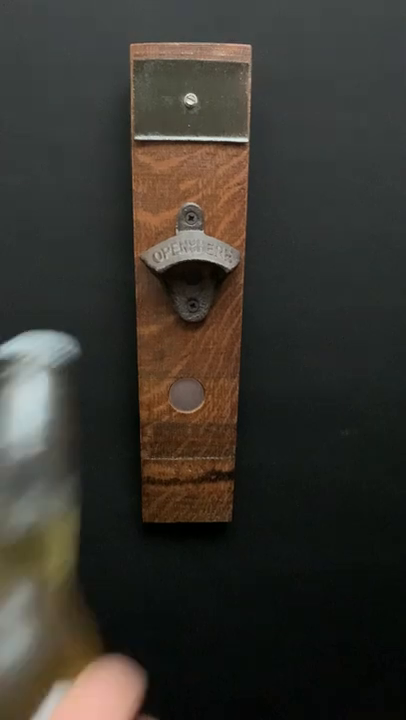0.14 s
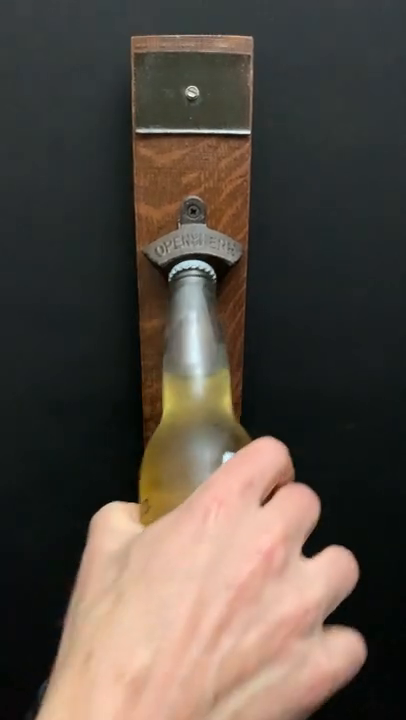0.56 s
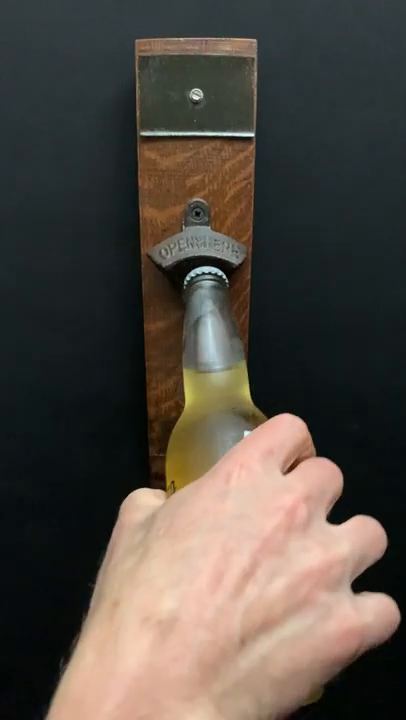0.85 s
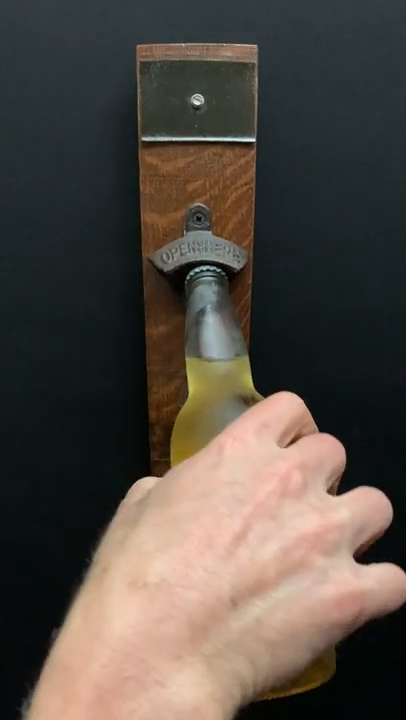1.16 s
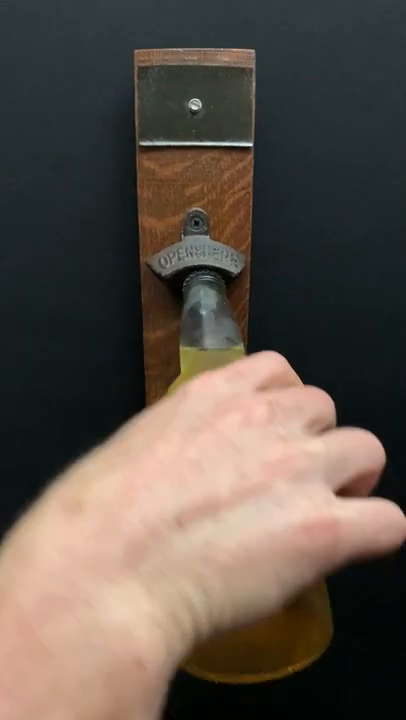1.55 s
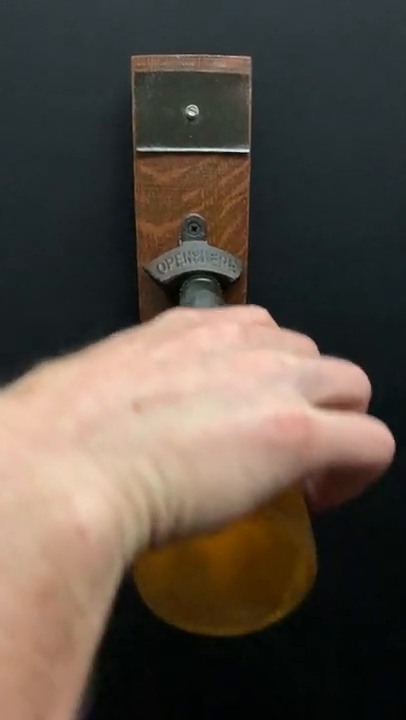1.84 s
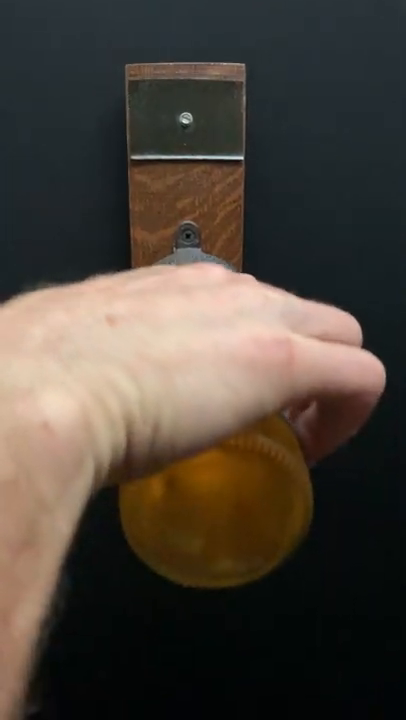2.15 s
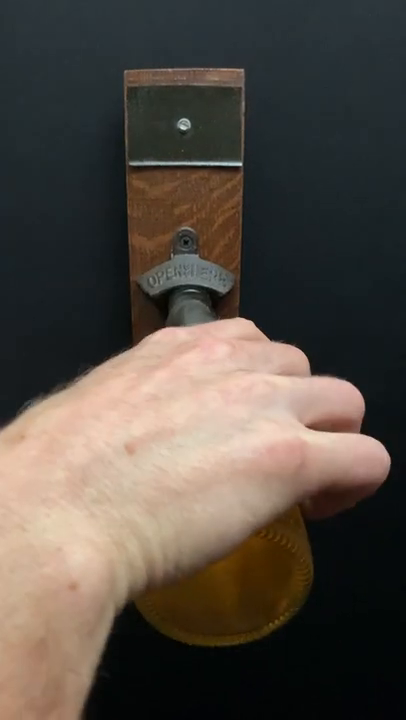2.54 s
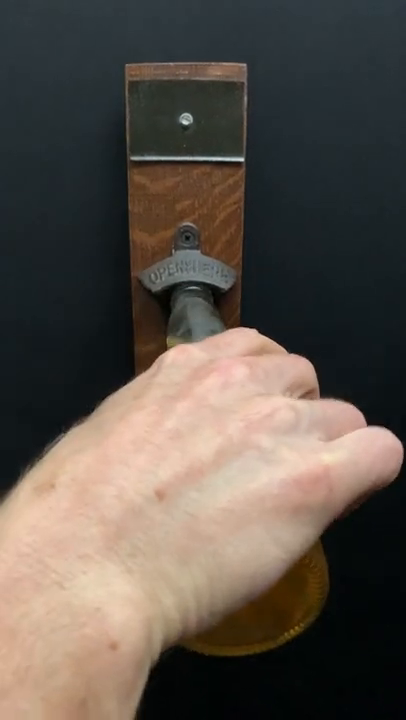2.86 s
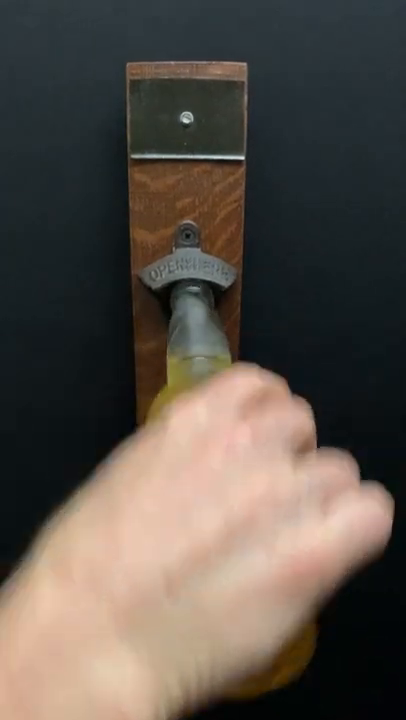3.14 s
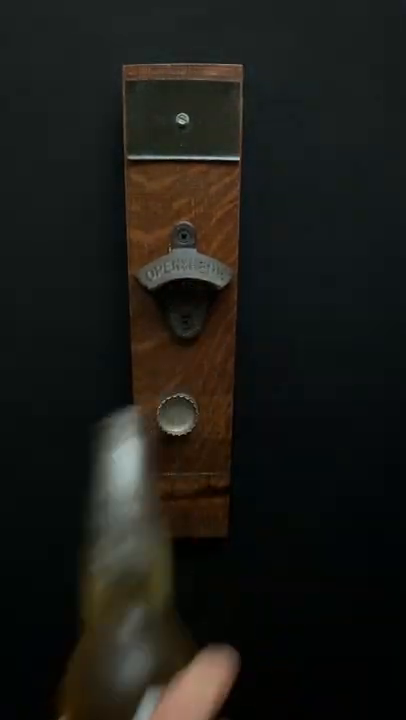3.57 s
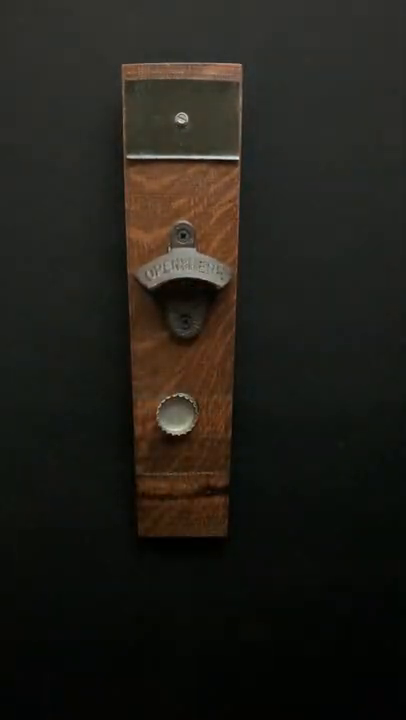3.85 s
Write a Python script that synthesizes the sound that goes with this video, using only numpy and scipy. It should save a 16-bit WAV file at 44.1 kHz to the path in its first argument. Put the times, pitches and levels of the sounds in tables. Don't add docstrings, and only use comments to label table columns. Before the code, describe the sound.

A bottle is opened on a wall opener, close, in a small room with low fridge hum. Glass taps iron and wood around 1.0 s, again at 1.5 and 2.0, with a firmer knock at 2.4. Gas spits for a tenth of a second at 2.85. At 3.2 the neck thumps free; at 3.36 the steel cap chatters loudly onto a magnet. The hum ducks, returning by 3.6.

```python
import sys
import numpy as np
from scipy import signal
from scipy.fft import rfft, irfft, next_fast_len
from scipy.io import wavfile
from scipy.ndimage import map_coordinates

SR = 44100
rng = np.random.default_rng(int(sys.argv[2]) if len(sys.argv) > 2 else 0)


def ratio(d):
    e = np.asarray(d, float) / 20
    return 10 ** e


def pcm_store(signal):
    levels = np.round(np.clip(np.atleast_2d(signal), -1, 1) * 32767)
    wavfile.write(sys.argv[1], SR, levels.astype(np.int16).T)


N = 176400


def unit(x):
    return x / np.sqrt(np.mean(x ** 2) + 1e-20)


def along(points, hz):
    f, v = np.transpose(points)
    return np.interp(np.log(hz + 1), np.log(f + 1), v)


def envelope(rows):
    s, db = np.transpose(rows)
    return ratio(np.interp(np.arange(N) / SR, s, db, -200, -200))


def wobble(rate):
    knots = rng.standard_normal(int(N * rate / SR) + 4)
    return map_coordinates(knots, [np.arange(N) * rate / SR])


def filtered(x, response):
    m = next_fast_len(N + 8192)
    hz = np.fft.rfftfreq(m, 1 / SR)
    return irfft(rfft(x, m) * response(hz), m)[..., :N]


def noise(points, channels=1):
    shut = [(points[0][0] / 2, -120)] + list(points) + [(points[-1][0] * 2, -120)]
    white = rng.standard_normal((channels, N))
    return unit(filtered(white, lambda hz: ratio(along(shut, hz))))


def ring(modes, attack_s, scatter_db, fuzz=0, count=SR // 3):
    t = np.arange(count) / SR
    out = np.zeros(count)
    for hz, db, t60 in modes:
        fall = ratio(db + scatter_db * rng.standard_normal() - 60 * t / t60)
        knot = np.minimum(t * 150, 95)
        blur = fuzz * map_coordinates(rng.standard_normal(99), [knot], order=1)
        out += fall * np.sin(2 * np.pi * hz * t + blur)
    return out * (1 - np.exp(-t / attack_s))


def add(out, s, x):
    part = out[round(s * SR):][:len(x)]
    part += x[:len(part)]


# start in seconds, peak in dB, main ring in Hz, ring t60 in seconds, brightness in dB.
GLASS_TAPS = [
    (1.006, -22, 1384, 0.036, -33),
    (1.020, -23, 1424, 0.043, -39),
    (1.0409, -15, 1630, 0.017, -25),
    (1.0537, -15.5, 1437, 0.17, -23.5),
    (1.0605, -24.5, 2950, 0.038, -24),
    (1.5348, -20.5, 1505, 0.054, -24),
    (2.0363, -23.5, 1890, 0.03, -25.5),
    (2.052, -30.5, 1776, 0.16, -28),
    (2.3836, -45.5, 3100, .015, -16),
    (3.217, -20, 2940, 0.018, 2),
]
# start in seconds, peak in dB, main ring in Hz,
# ring t60 in seconds, brightness in dB.
SOFT_NUDGES = [(1.009, -30, 750, 0.078, -30), (1.5849, -38, 1498, 0.13, -28),
               (2.0025, -36, 1300, 0.01, -22), (2.0325, -33, 1700, .015, -25),
               (2.3616, -32.5, 1150, 0.015, -33), (2.3607, -40, 1900, 0.011, -32.5),
               (2.4062, -24.5, 1192, 0.025, -6.5), (2.4177, -10, 1270, 0.018, 2.5),
               (2.4181, -17.5, 2880, 0.018, -2.5), (2.431, -31.5, 1300, .02, 2),
               (2.438, -31.5, 1500, 0.021, 8.5), (3.1706, -23.5, 950, 0.015, -22),
               (3.2088, -26.5, 3600, 0.017, -13)]
# mode in Hz, level in dB, t60 in seconds.
IRON_MODES = [(1120, -21.5, 0.028), (1726, -14.5, 0.055), (1995, -13, .05), (2800, -22.5, 0.08),
              (2944, -15.5, 0.054), (3310, -21, 0.031), (3907, -24.5, 0.049), (5007, -19, 0.07),
              (6370, -25.5, 0.04)]
# frequency in Hz, density in dB per Hz.
CRACK_COLOUR = [(1000, -24), (1600, -12.5), (4000, -1), (6800, -3.5), (10000, 3.5), (16000, -17)]
# frequency in Hz, density in dB per Hz.
WOOD_COLOUR = [(150, -4), (400, 1.5), (900, -3.5), (1500, 8.5), (3000, -7.5), (4200, -21.5), (6000, -15.5)]


def taps():
    out = np.zeros(N)
    crack, wood = noise(CRACK_COLOUR)[0], noise(WOOD_COLOUR)[0]
    hits = [(*row, 0) for row in GLASS_TAPS] + [(*row, -10.5) for row in SOFT_NUDGES]
    for s, db, hz, t60, bright_db, iron_db in hits:
        glass = ring([(hz, -4, t60), (hz * 1.085, 0, .018)], .0006, 0, fuzz=0.5)
        iron = ratio(iron_db) * ring(IRON_MODES, 0.0013, 3.27, fuzz=1.2)
        t = np.arange(len(glass)) / SR
        here = slice(round(s * SR), round(s * SR) + len(glass))
        knock = ratio(-12 + iron_db / 2 - 60 * t / 0.072) * wood[here]
        knock += ratio(bright_db - 60 * t / 0.014) * crack[here]
        add(out, s, ratio(db - 4.5) * (glass + iron + knock * (1 - np.exp(-t / 0.00077))))
    return out


# mode in Hz, level in dB, free t60 in seconds.
CAP_MODES = [(1960, -11, 0.098), (2674, -11.5, 0.066), (3990, -8, 0.029), (4995, -0.5, 0.07),
             (5400, 0, 0.071), (6020, -1, 0.093), (6584, -1.5, 0.062), (7600, -2, 0.033),
             (8240, -1.5, 0.054), (9200, 0, 0.077), (10250, -5.5, .06), (11510, -8.5, 0.046),
             (13460, -9.5, 0.079), (14900, -3.5, 0.088)]
# frequency in Hz, density in dB per Hz.
GRIT_COLOUR = [(3500, -14), (5000, 0), (7000, -2.5), (10000, -1), (14500, -5)]


def strike_cap(hits, fall_db, damp, grit_db):
    out, grit = np.zeros(N), noise(GRIT_COLOUR)[0]
    for s, db, top_hz in hits:
        modes = [(hz, g - fall_db * abs(np.log2(hz / top_hz)), t60 * damp) for hz, g, t60 in CAP_MODES]
        x = ring(modes, 0.00015, 5.1, fuzz=0.91, count=SR // 12)
        t = np.arange(len(x)) / SR
        x = x + ratio(grit_db - 60 * t / 0.017) * grit[round(s * SR):][:len(x)]
        add(out, s, ratio(db - 2) * x)
    return out


# start in seconds, peak in dB, strongest region in Hz.
CAP_TICKS = [(.457, -51, 7600), (1.689, -57.5, 6960), (1.944, -59.5, 8300), (3.0913, -40, 9900),
             (3.1033, -27, 9300), (3.174, -46.5, 7000), (3.177, -40, 10000), (3.210, -24.5, 9450),
             (3.217, -20, 9500), (3.267, -46, 3800), (3.2998, -29.5, 9000), (3.2999, -34, 14900),
             (3.3195, -23, 9040), (3.3196, -35, 14900), (3.327, -26.5, 9000), (3.3272, -30, 14900)]


def cap_ticks():
    return strike_cap(CAP_TICKS, fall_db=18.5, damp=0.13, grit_db=-9)


# time in seconds, flow in dB.
GAS_FLOW = [
    (2.843, -62),
    (2.847, -57.5),
    (2.862, -42.5),
    (2.88, -26.5),
    (2.895, -19),
    (2.91, -18.5),
    (2.93, -23.5),
    (2.95, -45),
    (2.96, -61.5),
]
# frequency in Hz, density in dB per Hz.
JET_COLOUR = [(600, -36.5), (1500, -33.5), (3300, -17), (5000, -20.5), (7000, -11), (9500, -2),
              (12500, -1.5), (15500, -5)]


def gas():
    spit_db = 2 * wobble(400) + 1.4 * wobble(90)
    return ratio(3.5 + spit_db) * noise(JET_COLOUR)[0] * envelope(GAS_FLOW)


# start in seconds, level in dB, pitch in Hz, t60 in seconds.
BOARD_THUMPS = [(1.066, -20.5, 110.6, 0.079), (1.545, -32, 150, 0.094), (2.028, -27.5, 148, 0.0825),
                (2.42, -23, 171.3, 0.085), (2.427, -24.5, 104.9, 0.179), (1.078, -13, 139, 0.025),
                (3.173, -11.5, 380, 0.055), (3.18, -7, 114.3, 0.079), (3.186, -17, 230, .04),
                (3.194, -14, 164.3, 0.058), (3.176, -35, 830, 0.078), (3.28, -35.5, 870, .06),
                (3.285, -36, 510, .06), (1.7, -30.5, 120, .06), (1.005, -29, 120, 0.063),
                (3.204, -14, 292.4, 0.092), (3.212, -21, 413, 0.065), (3.257, -24.5, 90, 0.072),
                (3.286, -28, 472.6, 0.072)]


def board():
    out = np.zeros(N)
    for s, db, hz, t60 in BOARD_THUMPS:
        modes = [(hz, 0, t60), (hz * 1.6, -9, t60 / 2)]
        add(out, s, ratio(db) * ring(modes, 0.0043, 0, fuzz=1.0))
    return out


# time in seconds, level in dB.
NECK_LEVEL = [(3.315, -32.5), (3.33, -29), (3.345, -24), (3.356, -21), (3.37, -67), (3.4, -58.5)]


def neck():
    since = np.clip(np.arange(N) / SR - NECK_LEVEL[0][0], 0, .04)
    hz = (472 - 1100 * since) * (1 + 0.011 * wobble(40))
    phase = 2 * np.pi * np.cumsum(hz) / SR
    return envelope(NECK_LEVEL) * (np.sin(phase) + ratio(-18) * np.sin(2 * phase))


# time in seconds, level in dB.
FINE_CHATTER = [
    (3.344, -48),
    (3.354, -27),
    (3.361, -16),
    (3.372, -14),
    (3.384, -28),
    (3.395, -43),
]
# time in seconds, level in dB.
SCRAPE_LEVEL = [(3.205, -54), (3.245, -53), (3.262, -49.5), (3.285, -45), (3.291, -56), (3.3, -51.5),
                (3.345, -48)]
# mode in Hz, level in dB, t60 in seconds.
RIM_MODES = [(2900, -1.5, 0.0058), (3700, -3.5, .008), (4400, -7.5, 0.0037), (5520, -2, .02),
             (8600, -10, .005)]
# start in seconds, peak in dB, strongest region in Hz.
MAGNET_BLOWS = [(3.3462, -32.5, 5275), (3.3497, -26, 5400), (3.354, -28, 4900), (3.3555, -20.5, 5300),
                (3.357, -16.5, 5050), (3.3603, -7, 5220), (3.3624, -14.5, 5400), (3.3639, -8.5, 5230),
                (3.3643, -12.5, 9200), (3.3665, -2, 8100), (3.3681, -6, 9250), (3.3701, -6, 9280),
                (3.3703, -9.5, 5570), (3.3717, -7.5, 14900), (3.3738, -5, 9200), (3.374, -7.5, 5900),
                (3.3753, -7, 9200), (3.3767, -11, 14900), (3.378, -9, 6900), (3.3797, -12, 4800),
                (3.3812, -13, 6200), (3.384, -19, 5900), (3.3857, -22.5, 6450)]
# mode in Hz, level in dB, t60 in seconds.
SETTLED_MODES = [(1820, -26, 0.32), (1966, -19.5, .06), (9200, -32, 0.25)]


def rattle():
    contact = rng.random(N) < 1500 / SR
    blows = contact * ratio(4 * rng.standard_normal(N))
    blows = unit(blows * np.sign(rng.standard_normal(N)))
    short = [(hz, g, t60 * .14) for hz, g, t60 in CAP_MODES]
    low = ring(short[:5], .0001, 0, fuzz=0.99, count=SR // 12)
    high = ring(short[5:], .0001, 0, fuzz=0.99, count=SR // 12)
    early_level = envelope(FINE_CHATTER)
    late_level = np.roll(early_level, round(.007 * SR))
    fine = signal.fftconvolve(blows * np.array([early_level, late_level]), [low, high], axes=1)
    out = fine.sum(0)[:N] / np.linalg.norm(low + high)
    add(out, 3.365, ring(SETTLED_MODES, .004, 0, fuzz=.35))
    rim = ring(RIM_MODES, .0001, 0, fuzz=0.99, count=SR // 12)
    rubbing = blows * envelope(SCRAPE_LEVEL) * ratio(4 * wobble(160))
    scrape = signal.fftconvolve(rubbing, rim)[:N] / np.linalg.norm(rim)
    return out + scrape + ratio(-1.5) * strike_cap(MAGNET_BLOWS, fall_db=19, damp=.17, grit_db=-12.5)


# frequency in Hz, side level in dB.
WALL_COLOUR = [(130, -13), (300, -21), (550, -9), (900, -6), (4000, -5), (4700, -22.5), (16000, -17)]


def early(x):
    t = np.arange(SR // 20) / SR
    tail = rng.standard_normal(SR // 20) * ratio(-60 * t / 0.056)
    answer = signal.fftconvolve(x, tail / np.linalg.norm(tail))[:N]
    side = filtered(answer, lambda hz: ratio(along(WALL_COLOUR, hz)))
    return np.array([side, -side])


# frequency in Hz, t60 in seconds.
ROOM_DECAY = [(200, 0.41), (1500, 0.27), (5000, 0.32), (10000, 0.2), (16000, 0.15)]
# frequency in Hz, side share from 0 to 1.
ROOM_WIDTH = [(200, .3), (600, .9), (3600, .8), (4400, .06)]


def room(x):
    hz, t, z = signal.stft(rng.standard_normal((2, SR // 2)), SR, nperseg=256)
    decay = ratio(-60 * t / along(ROOM_DECAY, hz)[:, None])
    tail = signal.istft(z * decay, SR, nperseg=256)[1]
    delayed = np.pad(x, (200, 0))[None]
    mid, side = signal.fftconvolve(delayed, tail / np.linalg.norm(tail[0]), axes=1)[:, :N]
    side = filtered(side, lambda hz: along(ROOM_WIDTH, hz))
    return np.array([mid + side, mid - side])


# multiple of the motor speed, level in dB rms.
LOW_HUM = [(1, -39), (2, -56), (3, -62.5), (4, -69), (5, -56.5), (10, -73)]
# multiple of the motor speed, level in dB rms.
HIGH_WHINE = [(18, -81), (20, -78), (29, -86), (30, -70), (31, -76), (34, -88.5), (37, -80), (40, -82)]
# frequency in Hz, density in dB per Hz.
RUMBLE_COLOUR = [(35, -16.5), (60, -8.5), (92, 0.5), (130, -14), (200, -24.5), (350, -18), (500, -28),
                 (800, -38)]
# frequency in Hz, density in dB per Hz.
CASING_COLOUR = [(600, -3), (1100, 0.5), (1400, -8.5), (1790, 9), (2100, -3.5), (2350, -1), (2800, -20.5),
                 (4000, -24)]
# frequency in Hz, density in dB per Hz.
AIR_COLOUR = [(3000, -4), (5000, 0.5), (9000, -4.5), (12000, -5.5), (16000, -5.5)]
# frequency in Hz, left-right likeness up to 1.
LIKENESS = [(60, 0.94), (130, 1), (290, 0.89), (640, 0.21), (1800, 0.12), (3500, 0.72)]
# frequency in Hz, left over right in dB.
LEFT_LEAN = [(60, 2.6), (150, 1.5), (300, -2), (600, -3), (1000, 0)]


def motor_orders(rows, phase, flutter_db, rate):
    out = np.zeros(N)
    for k, db in rows:
        start = rng.uniform(0, 2 * np.pi) * (k > 1) - 2.3
        out += np.sqrt(2) * ratio(db + flutter_db * wobble(rate)) * np.sin(k * phase + start)
    return out


def fridge():
    phase = 2 * np.pi * np.cumsum(58.48 * (1 + 0.00074 * wobble(1.96))) / SR
    hum = motor_orders(LOW_HUM, phase, 1.97, 5.325) + motor_orders(HIGH_WHINE, phase, 2.5, 27)
    pair = ratio(-47.5 + 0.5 * wobble(6.2)) * noise(RUMBLE_COLOUR, channels=2)
    pair += ratio(-66 + 1.5 * wobble(4) + 1.0 * wobble(27)) * noise(CASING_COLOUR, channels=2)
    pair += ratio(-81) * noise(AIR_COLOUR, channels=2)

    def mid_side(hz):
        angle = np.arccos(np.clip(along(LIKENESS, hz), -1, 1)) / 2
        return np.array([np.cos(angle), np.sin(angle)])

    mid, side = filtered(pair, mid_side)
    stereo = np.array([hum + mid + side, hum + mid - side])
    return filtered(stereo, lambda hz: ratio(np.outer([.5, -.5], along(LEFT_LEAN, hz))))


def turned(x, lead):
    return filtered(x, lambda hz: np.exp(1j * np.outer([.5, -.5], np.interp(hz, *np.transpose(lead)))))


# frequency in Hz, left lead in radians.
MAGNET_LEAD = [(3900, .6), (4750, 1.3), (5600, .5), (6500, .3), (7500, 0)]


def scene():
    mix = fridge()
    for x in [taps(), cap_ticks(), board() + neck(), gas()]:
        mix = mix + x + early(x) + ratio(-13) * room(x)
    clack = rattle()
    return mix + turned(clack + early(clack) + ratio(-2) * room(clack), MAGNET_LEAD)


def top_cut(x):
    return signal.sosfilt(signal.butter(12, 16980, fs=SR, output="sos"), x)


# frequency in Hz, left lead in radians.
CHANNEL_LEAD = [(500, 0), (1350, -.9), (2800, .7), (3900, -.9), (4750, -2.9), (5500, -3), (8500, 0),
                (16000, 6.15)]
# time in seconds, gain in dB.
GAIN_DUCK = [
    (3.372, -1.5),
    (3.394, -16.5),
    (3.5, -15.5),
    (3.555, -10.5),
    (3.6, -2.5),
    (3.9, -2),
]


def record(dry):
    x = filtered(turned(dry, CHANNEL_LEAD), lambda hz: np.clip((16000 - hz) / 300, 0, 1))
    t = np.arange(N) / SR
    x = x * ratio(np.interp(t, *np.transpose(GAIN_DUCK)))
    return top_cut(x * (t > .0363))


dry = scene()
out = record(dry)
pcm_store(out)
```